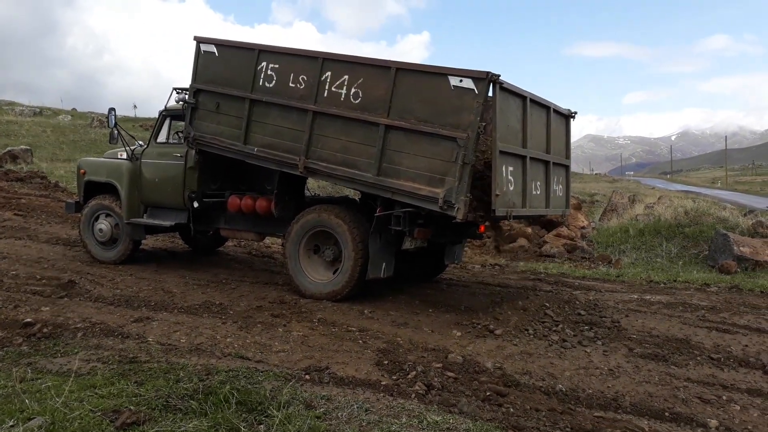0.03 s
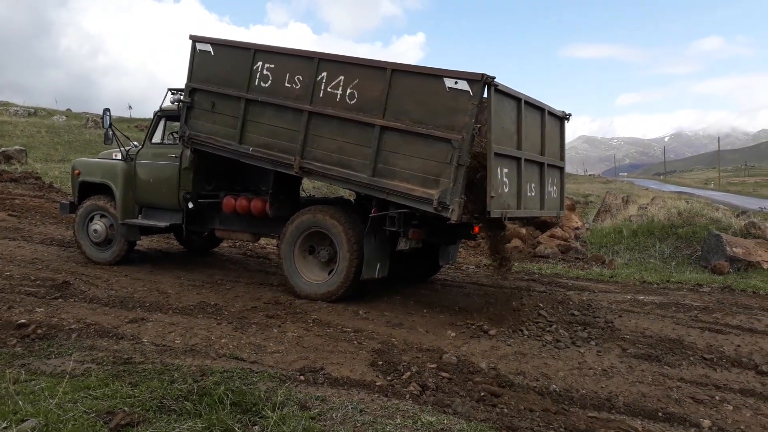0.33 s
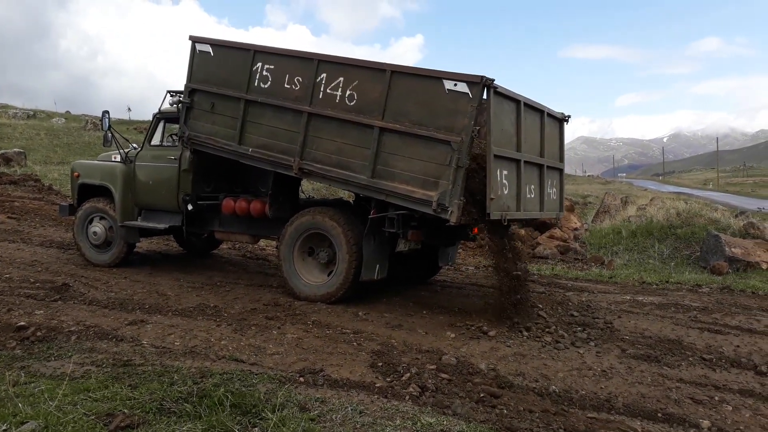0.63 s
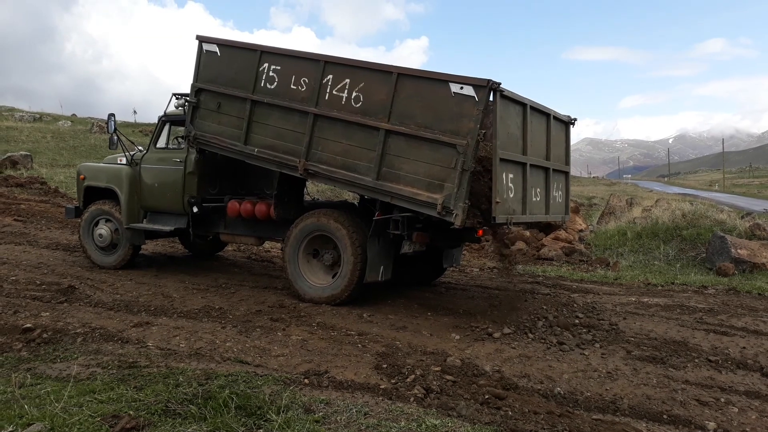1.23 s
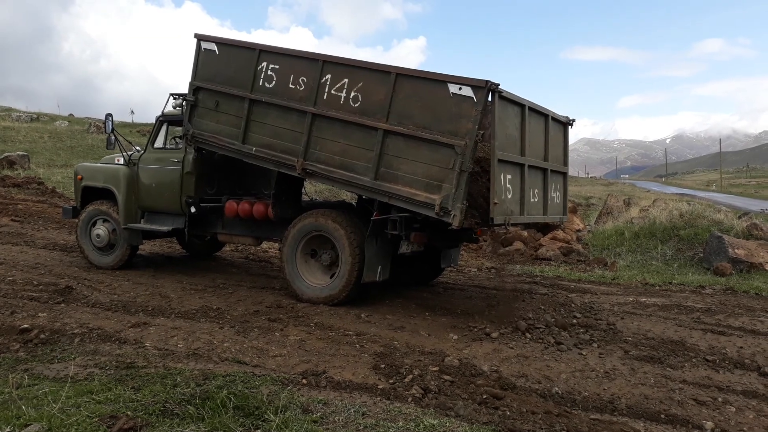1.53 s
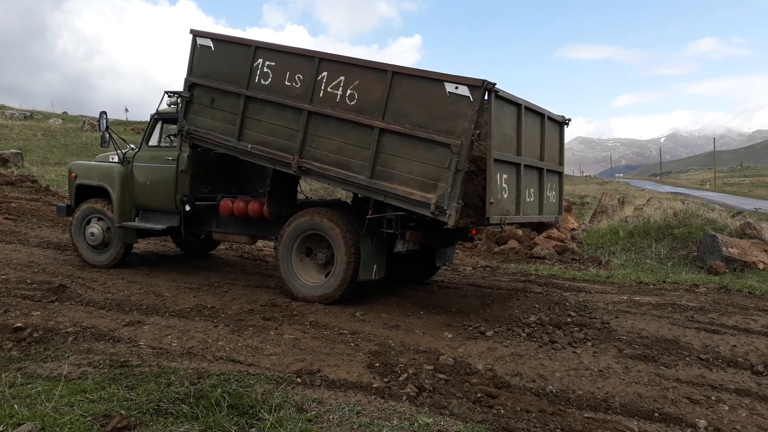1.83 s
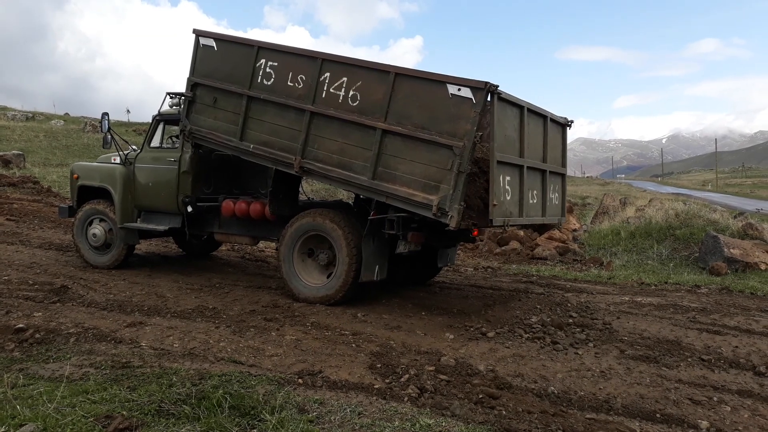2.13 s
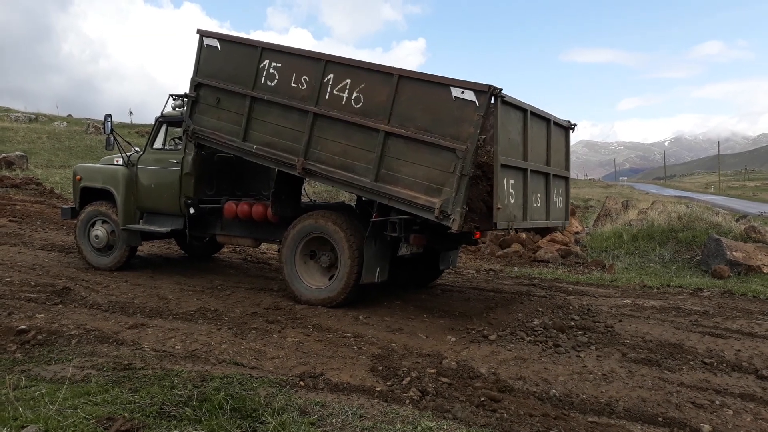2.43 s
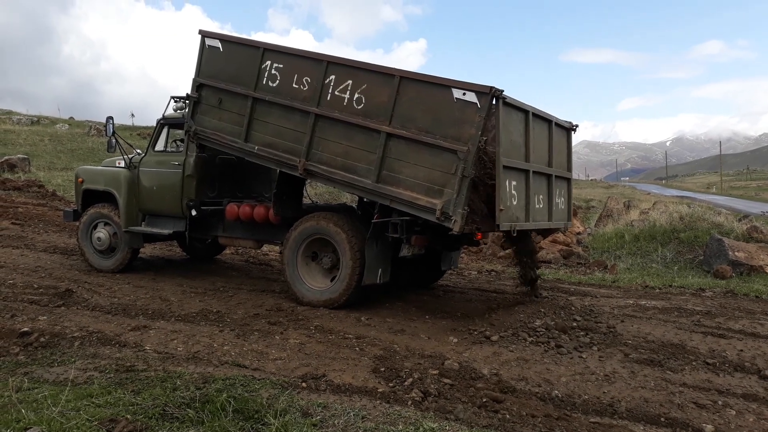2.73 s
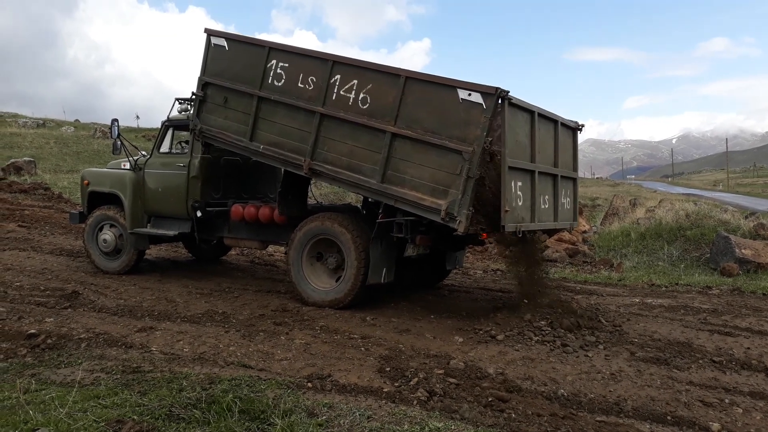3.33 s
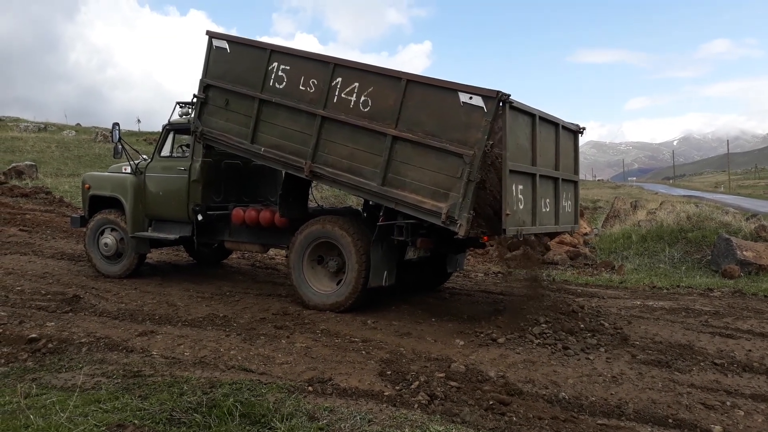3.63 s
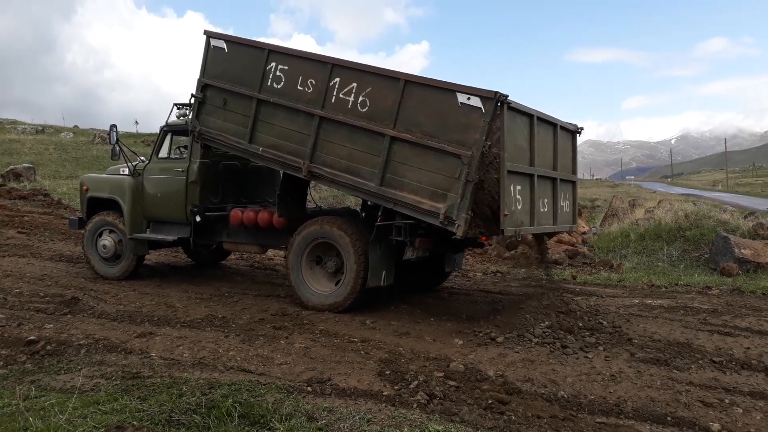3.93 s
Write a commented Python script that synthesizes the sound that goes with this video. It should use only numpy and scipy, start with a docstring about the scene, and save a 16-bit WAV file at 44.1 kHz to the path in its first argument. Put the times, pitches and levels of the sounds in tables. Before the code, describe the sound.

Soil rushes off a dump truck bed with a gritty hiss, peaking around 0.7 seconds and fading. A second, softer pour swells around 3 seconds and dies away after 3.5. Stones click sharply throughout and crumbs trickle. Wind thumps and rumbles on the microphone, hardest in the first half second and from 1 to 1.8 seconds. The engine throbs underneath, and a distant bird gives a few faint chirps.

```python
"""Dump truck tipping soil

On an open dirt track, soil pours off the bed in two rushes of tiny impacts. Crumbs trickle down and
stones click on the tailgate and the ground. The engine throbs underneath, wind eddies thump and
rumble on the microphone, and a small bird twitters far off."""
import sys
import numpy as np
from scipy import signal
from scipy.fft import rfft, irfft, next_fast_len
from scipy.io import wavfile

SR = 44100
rng = np.random.default_rng(int(sys.argv[2]) if len(sys.argv) > 2 else 0)


def waveform_to_disk(signal):
    """Save audio, clipped to [-1, 1], as 16-bit WAV at the path in sys.argv[1]."""
    frames = np.transpose(np.atleast_2d(signal))
    scaled = np.clip(frames, -1, 1) * 32767
    samples = np.round(scaled).astype(np.int16)
    wavfile.write(sys.argv[1], SR, samples)


N = 176400
T = np.arange(N) / SR
LOW_CUT_HZ, HIGH_CUT_HZ = 79.7, 15900


def from_db(db):
    """Decibels to gain."""
    return 10 ** (np.asarray(db) / 20)


def unit_rms(x):
    """Scale to unit power."""
    return x / np.sqrt(np.mean(x ** 2) + 1e-20)


def drift(hz):
    """Slow random wander, unit RMS."""
    step, settle = 40, 2000
    pole = np.exp(-2 * np.pi * hz * step / SR)
    noise = rng.standard_normal(N // step + settle + 2)
    slow = signal.lfilter([1], [1, -2 * pole, pole * pole], noise)[settle:]
    return np.interp(np.arange(N) / step, np.arange(len(slow)), unit_rms(slow))


def colour(x, spectrum):
    """Minimum-phase filter through (frequency [Hz], gain [dB]) points."""
    hz, db = np.transpose(spectrum)
    size = next_fast_len(N + SR // 2, True)
    grid_hz = np.maximum(np.arange(size // 2 + 1) * SR / size, 1)
    gain = from_db(np.interp(np.log(grid_hz), np.log(hz), db))
    cepstrum = irfft(np.log(gain), size)
    cepstrum[1:size // 2] *= 2
    cepstrum[size // 2 + 1:] = 0
    return irfft(rfft(x, size) * np.exp(rfft(cepstrum)), size)[:N]


def butter(x, hz, kind):
    """Butterworth low-, high- or band-pass."""
    return signal.sosfilt(signal.butter(2, hz, kind, fs=SR, output="sos"), x)


def add(out, start_s, sound):
    """Mix a short sound in at start_s."""
    i = int(start_s * SR)
    a, b = max(i, 0), min(i + len(sound), N)
    if b > a:
        out[a:b] += sound[a - i:b - i]


# engine and fan noise (time [s], relative level [dB])
ENGINE_LEVEL = [(0.0, -43), (2.51, -51), (4.0, -45.5)]
# noise shape (frequency [Hz], gain [dB])
ENGINE_SPECTRUM = [(60, -0.5), (300, 5), (800, 5), (1100, 4.5), (2300, -1), (3100, -17.5), (4200, -15),
                   (6300, -24), (8800, -24.5), (12000, -32.5), (16000, -38)]
# tones (frequency [Hz], level [dB])
ENGINE_TONES = [(296, -46.5), (411, -45.5), (608, -48.5)]
ENGINE_NOISE_DB, TONE_WIDTH_HZ = 9, 9
FIRING_HZ, FIRING_DEPTH = 23.95, 0.061

def engine():
    """Mechanical noise and rough, unsteady tones, throbbing at the firing rate."""
    level_db = np.interp(T, *np.transpose(ENGINE_LEVEL)) + ENGINE_NOISE_DB
    noise = unit_rms(colour(rng.standard_normal(N), ENGINE_SPECTRUM))
    tones = np.zeros(N)
    for hz, db in ENGINE_TONES:
        wander = drift(TONE_WIDTH_HZ) + 1j * drift(TONE_WIDTH_HZ)
        tones += from_db(db) * np.real(wander * np.exp(2j * np.pi * hz * T))
    throb = 1 + FIRING_DEPTH * np.sin(2 * np.pi * FIRING_HZ * T)
    return (from_db(level_db) * noise + tones) * throb


THUMP_WIDTH_CYCLES, THUMP_PHASE_RAD, PHASE_SPREAD_RAD = 0.34, 1.79, 0.74
BODY_DB, BODY_PITCH_RATIO = -10.5, 0.37

def thumps(eddies):
    """Each eddy is one pressure swing, push then suction, on a slower body of air."""
    out, t = np.zeros(N), np.arange(-SR // 80, SR // 80) / SR
    phases = THUMP_PHASE_RAD + PHASE_SPREAD_RAD * rng.uniform(-1.12, 1, len(eddies))
    for (s, db, hz), phase in zip(eddies, phases):
        swing, body = (np.cos(2 * np.pi * cycles + phase) * np.exp(-(cycles / THUMP_WIDTH_CYCLES) ** 2)
                       for cycles in (t * hz, t * hz * BODY_PITCH_RATIO))
        add(out, s + t[0], from_db(db) * (swing + from_db(BODY_DB) * body))
    return out


SHED_DB, SHED_SPREAD_DB, SHED_SPREAD_S, SHED_PITCH_RATIO = -12.5, 3.5, 0.00646, 1.2
BREAKUP_DB_PER_DB = 0.19  # stronger wind: more shedding, more wake

def shed_eddies(buffets, gust_db, count):
    """Rows of small, sharp eddies scattered around each buffet."""
    s, db, hz = np.repeat(buffets, count, axis=0).T
    delay, octaves, size = 2 * rng.random((len(s), 3)).T - 1
    local_db = np.interp(s, T, gust_db)
    size_db = db + SHED_DB + SHED_SPREAD_DB * size + BREAKUP_DB_PER_DB * (local_db - local_db.mean())
    pitch_hz = hz * SHED_PITCH_RATIO * 2 ** (.5 * octaves)
    return np.column_stack([s + SHED_SPREAD_S * delay, size_db, pitch_hz])


WAKE_S, WAKE_DB = 0.015, -22.5

def turbulence_db(buffets, gust_db):
    """Level of the gusts plus the churned wake around each buffet."""
    wake_power, t = np.zeros(N), np.arange(-SR // 10, SR // 10) / SR
    for s, db, _ in buffets:
        add(wake_power, s + t[0], from_db(db + WAKE_DB) ** 2 * np.exp(-(t / WAKE_S - .5) ** 2))
    wake_power *= from_db(BREAKUP_DB_PER_DB * (gust_db - gust_db.max())) ** 2
    return 10 * np.log10(from_db(gust_db) ** 2 + wake_power)


EDDIES_PER_S, EDDY_HZ = 150, 318
EDDY_DB, EDDY_SPREAD_DB, EDDY_DB_PER_DB = -33.5, 9, 1.4

def flutter(churn_db):
    """Small random eddies, stronger in churned air."""
    scatter_db = EDDY_SPREAD_DB * np.clip(rng.standard_normal(N), -2, 2)
    size_db = EDDY_DB + EDDY_DB_PER_DB * (churn_db - churn_db.mean()) + scatter_db
    hz = EDDY_HZ * 2 ** rng.uniform(-1, 1, N)
    born = rng.random(N) < EDDIES_PER_S / SR
    return thumps(np.column_stack([T, size_db, hz])[born])


# eddies hitting the microphone (time [s], relative level [dB], pitch [Hz])
BUFFETS = [(0.0327, -3.5, 249), (0.046, -5.5, 367), (0.1441, -0.5, 268), (0.156, -2, 362),
           (0.1623, 5.5, 320), (0.1843, -2.5, 370), (0.1921, -3, 306), (0.2364, 3.5, 420),
           (0.2643, 2.5, 292), (0.2902, -2.5, 393), (0.2981, 1, 396), (0.309, -3, 255), (0.3693, -1.5, 443),
           (0.3754, -6, 358), (0.4053, -0.5, 413), (0.8169, -5, 300), (0.92, -3.5, 380),
           (0.9333, -9.5, 275), (1.0627, -7, 378), (1.098, -3.5, 396), (1.159, 1, 414), (1.179, -5.5, 530),
           (1.1939, -2, 400), (1.2481, -6, 399), (1.2755, -4.5, 305), (1.298, 4, 460), (1.3179, 3, 500),
           (1.3369, 1, 543), (1.3486, 0, 560), (1.3674, -6, 320), (1.535, -8, 274), (1.5516, -1, 330),
           (1.5995, -5, 283), (1.6208, 0.5, 544), (1.638, 0.5, 470), (1.6467, -1.5, 252), (1.6744, 1, 480),
           (1.704, -4, 210.9), (1.722, -6, 287), (1.758, -5, 444), (1.773, -10, 325.4), (1.811, -8, 454),
           (2.367, -4.5, 390), (2.3799, -8.5, 780), (2.4331, -9, 270), (2.5697, 1.5, 235),
           (2.7024, -6, 402), (2.8082, -11, 234), (2.8696, -10, 276), (2.939, -8.5, 333),
           (2.9559, -11.5, 267), (3.1811, -11, 272), (3.3648, -18, 290), (3.7147, -2.5, 288)]
# wind strength (time [s], relative level [dB])
GUSTS = [(0.0, -22.5), (0.68, -28), (1.14, -26.5), (3.33, -33), (4.0, -31.5)]
# rumble shape (frequency [Hz], gain [dB])
RUMBLE_SPECTRUM = [(20, -43.5), (55, 0.5), (85, 1), (170, -2.5), (400, -20), (700, -35), (1500, -61)]
BUFFET_DB, WIND_TOP_HZ = -0.5, 1980
RUMBLE_DB, RUMBLE_SWING_DB = 3.5, 5

def wind():
    """Lumpy rumble and flutter swell around hard buffets, which overload the microphone softly."""
    gust_db = np.interp(T, *np.transpose(GUSTS))
    churn_db = turbulence_db(BUFFETS, gust_db)
    buffets = thumps(BUFFETS) + thumps(shed_eddies(BUFFETS, gust_db, count=4))
    noise = colour(rng.standard_normal(N), RUMBLE_SPECTRUM)
    rumble = unit_rms(noise * from_db(RUMBLE_SWING_DB * drift(hz=15.3)))
    air = from_db(BUFFET_DB) * buffets + from_db(churn_db + RUMBLE_DB) * rumble + flutter(churn_db)
    return butter(np.tanh(air), WIND_TOP_HZ, "low")


# bird notes (time [s], length [s], start pitch [Hz], end pitch [Hz], peak level [dB])
CHIRPS = [(0.017, 0.086, 3420, 4850, -50.5), (0.097, 0.02, 4170, 4160, -42), (1.3, 0.08, 4750, 4600, -59),
          (2.281, 0.08, 4900, 3280, -52.5), (2.68, 0.1, 4770, 3760, -54)]

def bird():
    """Thin, distant gliding whistles, broken up by the wind."""
    out = np.zeros(N)
    for s, length_s, start_hz, end_hz, db in CHIRPS:
        hz = np.geomspace(start_hz, end_hz, int(length_s * SR))
        whistle = np.sin(2 * np.pi * np.cumsum(hz) / SR)
        add(out, s, from_db(db) * signal.windows.tukey(len(hz), .5) * whistle)
    return out * np.clip(np.abs(drift(hz=40)), .5, 1)


# stone hits, relative levels (time [s], knock [dB], clack [dB], tick [dB])
STONE_HITS = [(0.0867, -44, -51, -29.5), (0.2494, -32, -36, -30.5), (0.304, -25, -26, -37),
              (0.3277, -29, -18, -22), (0.4142, -30, -21, -27), (0.4468, -22, -28, -22.5),
              (0.451, -15, -19, -33), (0.773, -17, -16, -24), (0.822, -22, -16, -17),
              (1.0304, -11, -35, -17.5), (1.1402, -12, -10, -28), (1.1719, -41, -38, -22),
              (1.2284, -26, -21, -19), (1.422, -31, -24.5, -24), (1.4815, -17.5, -20, -26),
              (1.4938, -18, -23, -35), (1.5127, -18.5, -36, -48), (1.5843, -28, -16, -39),
              (1.6861, -17.5, -28, -56), (2.1, -50, -48, -32.5), (2.639, -31, -28.5, -24.5),
              (2.791, -23.5, -22.5, -58), (2.966, -22.5, -24, -33), (3.5631, -43, -14.5, -19.5),
              (3.607, -55, -35, -29), (3.854, -30, -23.5, -23.5), (3.9163, -42, -33, -29)]
# knock, clack and tick bands (low edge [Hz], high edge [Hz])
STONE_BANDS = [(1300, 2820), (3400, 5830), (7500, 12800)]
# microphone colour heard on the stones and soil grains (frequency [Hz], gain [dB])
MIC_COLOUR = [(500, -24), (2000, -3), (3200, -12.5), (4100, -5.5), (6500, -20.5), (8600, -1.5),
              (10300, -13), (12400, -15.5), (15700, -6)]
BAND_GAIN_DB, BAND_T60_S = [0.5, -2, 2.5], [0.014, 0.016, 0.01]

def stones():
    """Each stone lands with a dry crack: its own mix of knock, clack and tick."""
    out, t = np.zeros(N), np.arange(SR // 20) / SR
    for k, (band_hz, gain_db, t60_s) in enumerate(zip(STONE_BANDS, BAND_GAIN_DB, BAND_T60_S)):
        envelope = np.zeros(N)
        for s, *levels_db in STONE_HITS:
            add(envelope, s, from_db(levels_db[k] + gain_db - 60 * t / t60_s))
        out += envelope * unit_rms(butter(rng.standard_normal(N), band_hz, "band"))
    return colour(out, MIC_COLOUR)


GRAIN_T60_S = 0.0015

def grains(per_s, spread_db):
    """Tiny random impacts of uneven size; mean power is independent of rate."""
    sizes = from_db(spread_db * np.minimum(rng.exponential(1, N), 4))
    hits = rng.random(N) < per_s / SR
    power_decay = from_db(-60 / (GRAIN_T60_S * SR)) ** 2
    power = signal.lfilter([1], [1, -power_decay], hits * sizes ** 2 / per_s + 1e-18)
    return unit_rms(colour(np.sqrt(power) * rng.standard_normal(N), MIC_COLOUR))


# crumb trickles (start [s], end [s], level [dB], low edge [Hz])
TRICKLES = [(0.28, 1.4, -53.5, 6800), (1.44, 1.58, -43, 2400), (2.78, 4.9, -55.5, 6800)]
CRUMBS_PER_S = 180

def crumbs():
    """Loose crumbs tick down, building fast and thinning slowly; coarser ones reach lower."""
    out = np.zeros(N)
    for start_s, end_s, db, low_hz in TRICKLES:
        progress = np.clip((T - start_s) / (end_s - start_s), 0, 1)
        flow = np.abs(np.sin(np.pi * np.sqrt(progress)))
        ticks = grains(1 + CRUMBS_PER_S * flow, spread_db=2.5)
        out += from_db(db) * flow * unit_rms(butter(ticks, (low_hz, HIGH_CUT_HZ), "band"))
    return out


# soil pours (full flow at [s], hold [s], relative level [dB])
POURS = [(0.694, 0.15, -44), (3.016, 0.44, -50)]
RISE_DB_PER_S, FALL_DB_PER_S = 57, 28.5
FINES_PER_S, FINES_DB, CLUMP_DB = 2500, 5.5, 2.2
GRIT_PER_S, GRIT_DB, GRIT_FLOW_EXPONENT = 200, -53.5, 0.8

def soil():
    """Each pour swells, holds and dies away: fine soil hisses, coarser grit knocks and clacks."""
    flow = np.zeros(N)
    for full_s, hold_s, db in POURS:
        before_s, after_s = np.maximum(full_s - T, 0), np.maximum(T - full_s - hold_s, 0)
        flow += from_db(db - RISE_DB_PER_S * before_s - FALL_DB_PER_S * after_s)
    surge = flow / flow.mean()
    density = np.sqrt(surge)
    fines = grains(FINES_PER_S * density, spread_db=6) * from_db(FINES_DB + CLUMP_DB * drift(hz=35))
    grit = sum(butter(grains(GRIT_PER_S * density, spread_db=5), band_hz, "band")
               for band_hz in STONE_BANDS[:2])
    return flow * fines + from_db(GRIT_DB) * surge ** GRIT_FLOW_EXPONENT * unit_rms(grit)


def scene():
    """Truck, load, bird and wind at one microphone."""
    return (engine() + soil() + crumbs() + stones() + bird() + wind())[None]


def record(dry):
    """The recorder thins the deep bass, clips at full scale and cuts the top."""
    clipped = np.clip(butter(dry, LOW_CUT_HZ, "high"), -1, 1)
    return signal.sosfilt(signal.ellip(12, .1, 80, HIGH_CUT_HZ, fs=SR, output="sos"), clipped)


dry = scene()
out = record(dry)
waveform_to_disk(out)
```